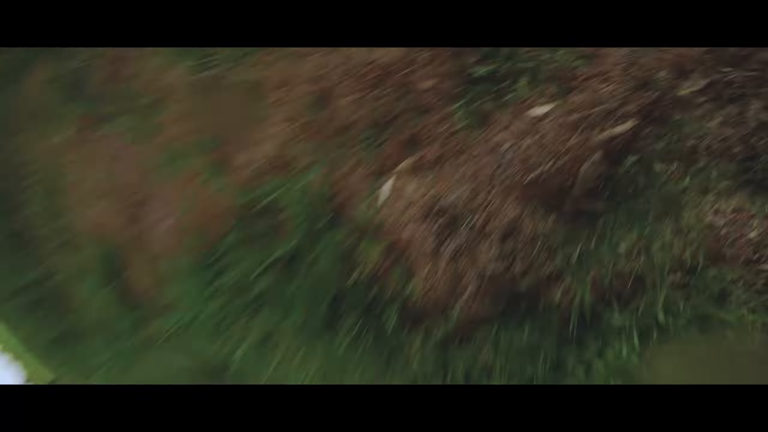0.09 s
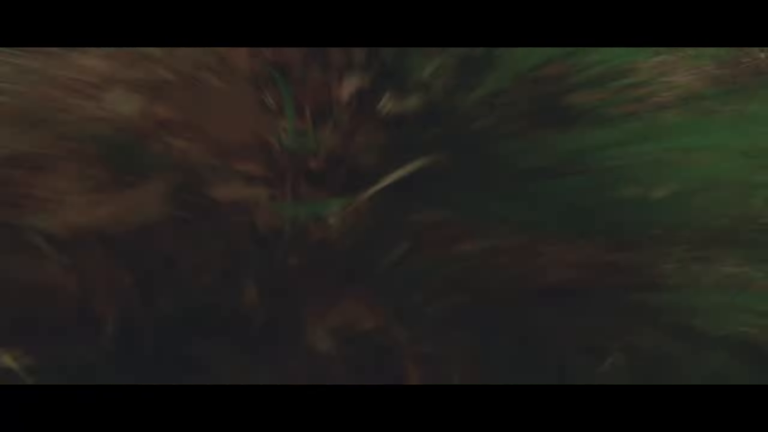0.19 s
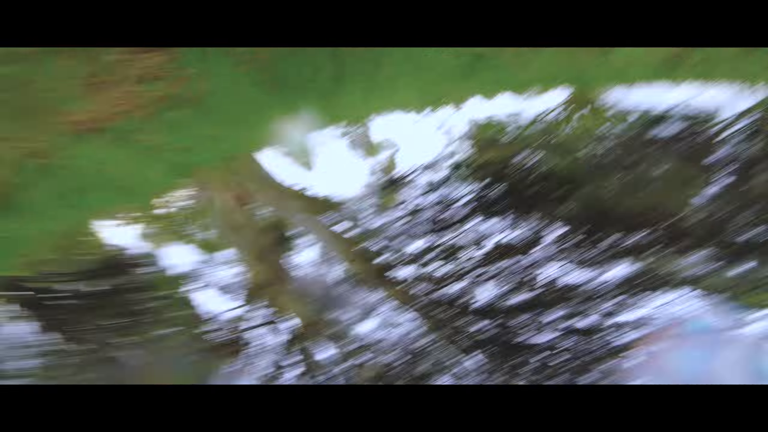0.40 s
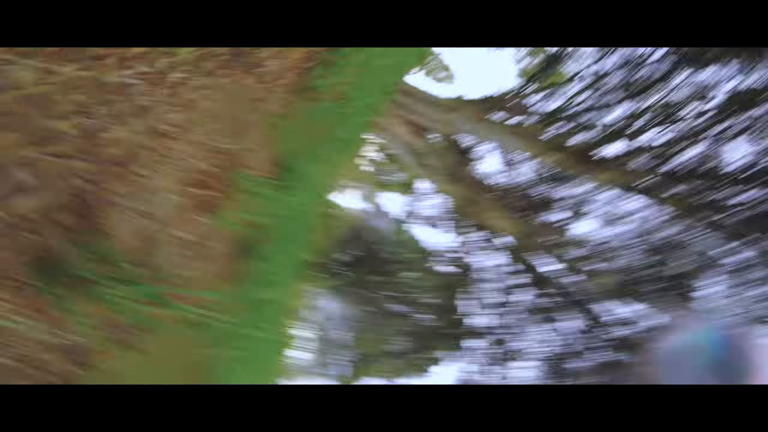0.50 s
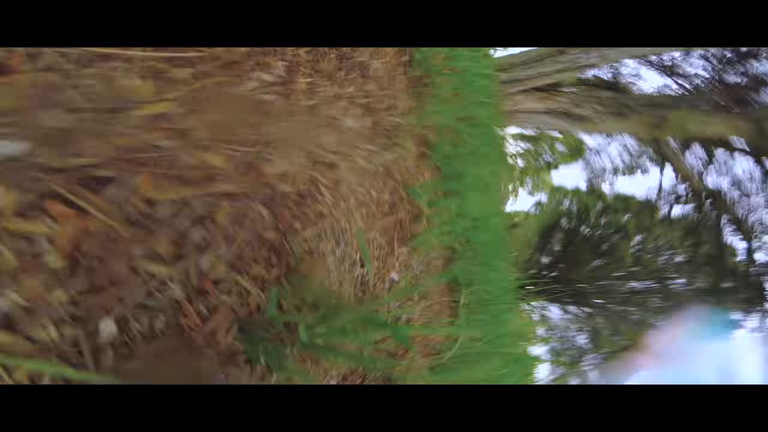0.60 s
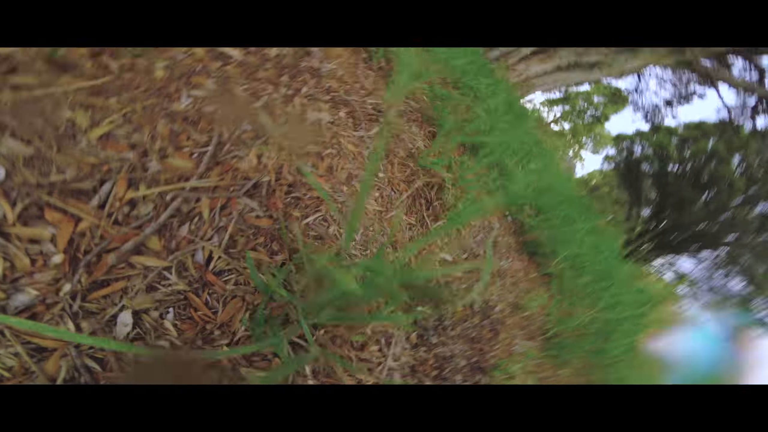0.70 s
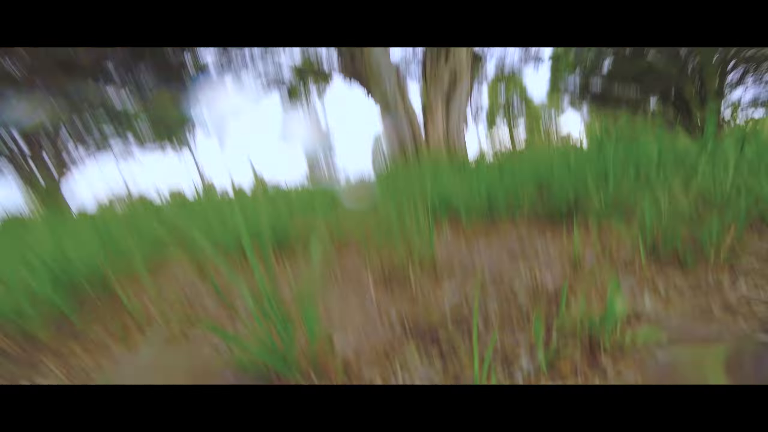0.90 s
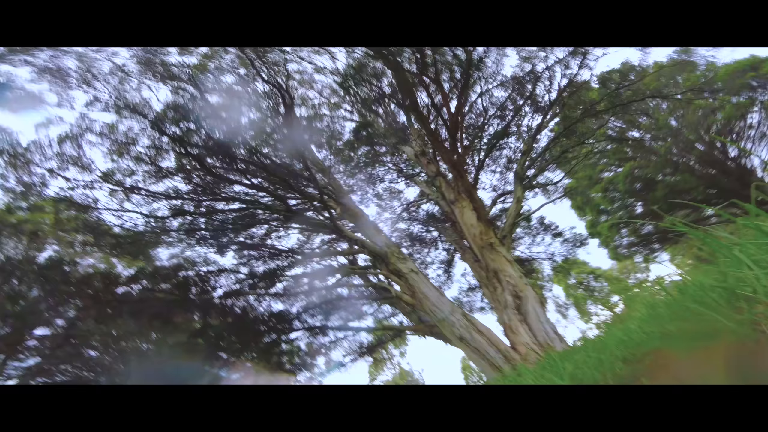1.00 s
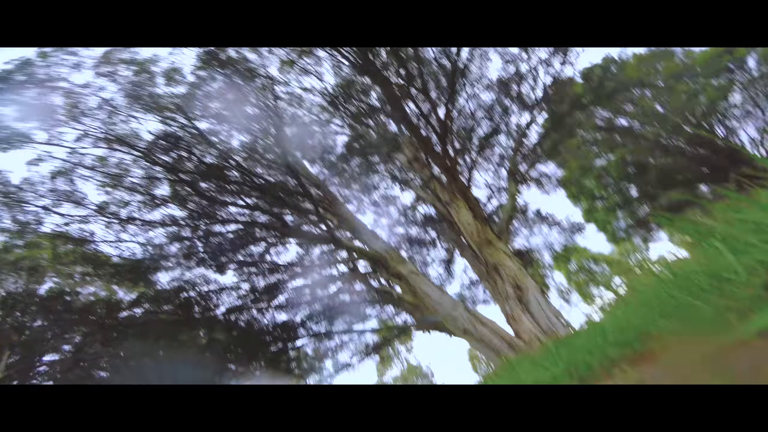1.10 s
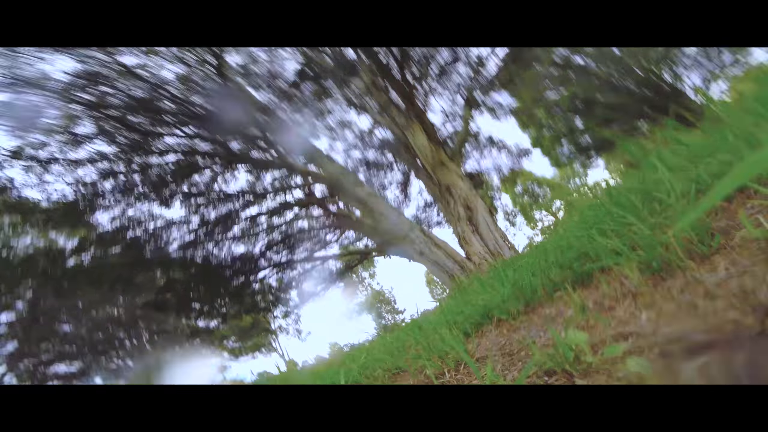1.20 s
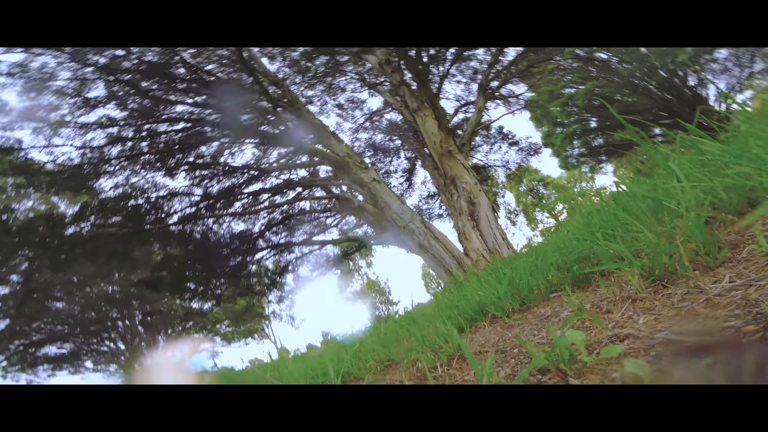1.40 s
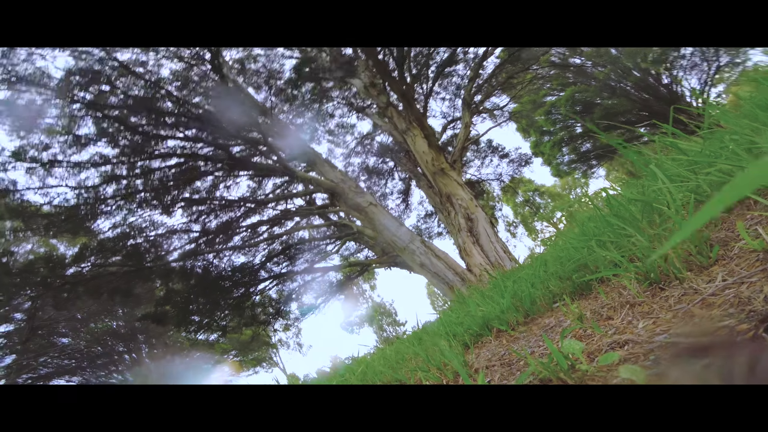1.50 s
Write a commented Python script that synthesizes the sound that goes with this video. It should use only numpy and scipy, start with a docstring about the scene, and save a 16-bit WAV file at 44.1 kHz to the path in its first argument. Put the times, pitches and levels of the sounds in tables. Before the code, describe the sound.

A small drone slams into grass and bark litter outdoors, a burst of distorted thuds, plastic knocks and twig snaps, then a few much weaker bumps, heard close through a microphone fixed to its frame.

```python
"""A small drone tumbles over grass and bark litter, heard from a camera bolted to it, mostly through its body.
A faint wavering sine hum of coasting propellers and noise layers of sway, shaking, scraping and rustling
run throughout. Near 0.2 s the first crash overloads the microphone: blows swing the soft mount and ring the
arms, crunchy knocks ring the frame and twig ticks ring the microphone port, all as filtered pulses.
Weaker contacts follow near 0.6 s, 1.0 s and from 1.2 s on."""
import sys
import numpy as np
from scipy import signal
from scipy.fft import rfft, irfft, next_fast_len
from scipy.io import wavfile
from scipy.ndimage import uniform_filter1d, map_coordinates

SR = 44100
rng = np.random.default_rng(int(sys.argv[2]) if len(sys.argv) > 2 else 0)


def wav_out(sig):
    """Save sig, one row per channel (or a flat mono array), as 16-bit PCM at SR to the path in sys.argv[1]."""
    wavfile.write(sys.argv[1], SR, np.round(np.clip(np.atleast_2d(sig).T, -1, 1) * 32767).astype(np.int16))


def voltage_ratio(level):
    """Linear amplitude factor for a level in decibels (scalar or array-like)."""
    return 10 ** (np.asarray(level, float) / 20)


N = 66150  # samples, 1.5 s

# Resonances of the microphone port. Each row: centre in Hz, width in Hz, gain in dB.
PORT = [(3060, 520, 5.5), (5854, 3860, 6.5), (9000, 1200, -2)]


def curves(rows):
    """Piecewise-linear interpolation: one value per sample for each column after the time."""
    s, *columns = np.transpose(rows)
    return [np.interp(np.arange(N) / SR, s, column) for column in columns]


def unit(x):
    """Normalization to an rms of 1."""
    return x / np.sqrt(np.mean(x ** 2) + 1e-20)


def filtered(x, response):
    """Linear filtering: the spectrum of x times a complex response of frequency."""
    m = next_fast_len(len(x) + SR // 2)  # zero padding leaves room for the ringing
    spectrum = rfft(x, m) * response(np.fft.rfftfreq(m, 1 / SR))
    return irfft(spectrum, m)[:len(x)]


def ring(x, modes, steep_hz):
    """Modal superposition: parallel damped resonators, rolled off at sixth order above steep_hz."""
    def response(f):
        body = sum(voltage_ratio(db) * 1j * f * width / (centre ** 2 - f * f + 1j * f * width)
                   for centre, width, db in modes)
        skirt = 1 + 1j * np.sqrt(2) * f / steep_hz - (f / steep_hz) ** 2
        return body / skirt ** 3
    return filtered(x, response)


def grains(per_s, spread_db):
    """Shot noise: impacts at random moments, Gaussian sizes with an exponential spread in dB."""
    hit = rng.random(N) < per_s / SR
    return hit * rng.standard_normal(N) * voltage_ratio(spread_db * rng.exponential(size=N))


def patchy(x):
    """Time-frequency modulation: smooth random patches of gain, 4 dB rms."""
    z = signal.stft(x, nperseg=512)[2]
    field = uniform_filter1d(rng.standard_normal(z.shape), size=4, axis=0)
    field = uniform_filter1d(field, size=5, axis=1)
    return signal.istft(z * voltage_ratio(4 * unit(field)), nperseg=512)[1][:N]


def propellers():
    """Frequency and amplitude modulation of a sine: a faint hum that wavers and mostly sinks as they coast."""
    # Each row: time in seconds, hum before waver in Hz, level before flutter in dB.
    coast = [(.02, 292, -60), (.06, 300.2, -46.5), (.14, 300, -67.5), (.3, 250, -80.5), (.45, 216.3, -51.5),
             (.55, 209.1, -60), (.68, 203, -51.5), (.76, 185.3, -51), (.86, 200, -58), (1, 173.5, -53.5),
             (1.1, 150.2, -42.5), (1.2, 145.2, -78.5), (1.3, 140, -79)]
    wavers_per_s, waver, flutter_db = 25, 0.025, 4
    hz, db = curves(coast)
    points = rng.standard_normal((2, 60))
    position = np.arange(N) * wavers_per_s / SR
    # a smooth spline through the random points of each row
    flutter_drift, pitch_drift = map_coordinates(points, [[[0], [1]] * np.ones(N), [position] * 2])
    phase = 2 * np.pi * np.cumsum(hz * (1 + waver * pitch_drift)) / SR
    return voltage_ratio(db + flutter_db * flutter_drift) * np.sin(phase)


def rustle():
    """Shot noise through resonances: grass impacts heard through the microphone port."""
    impacts = grains(3000, spread_db=0.5)
    bright = ring(impacts, PORT[1:], steep_hz=12400)
    return ring(bright, PORT, steep_hz=13600)


def scrape():
    """Friction as dense shot noise: litter dragged past excites resonances in shifting patches."""
    # Each row: centre in Hz, width in Hz, gain in dB.
    litter = [(606, 1000, -3), (1050, 100, 6), (1355, 300, -2), (1560, 380, -3)]
    return patchy(ring(grains(4000, spread_db=1), litter, steep_hz=2020))


def shake():
    """Random forcing of a resonant structure: sparser impacts shake the frame."""
    # Each row: centre in Hz, width in Hz, gain in dB.
    shake_modes = [(106, 29, -5.5), (160, 76, 14), (200, 45, -0.5), (300, 160, -6.5), (431, 220, -22)]
    return ring(grains(900, spread_db=-0.5), shake_modes, steep_hz=530)


def sway():
    """Spectral shaping of white noise: the slow, low-frequency sway of the mount."""
    # Each row: frequency in Hz, relative spectral density in dB.
    sway_spectrum = [(20, -0.5), (35, 4.5), (55, -8), (85, -11), (120, -40.5), (200, -75.5)]
    hz, db = np.transpose(sway_spectrum)
    return filtered(rng.standard_normal(N), lambda f: voltage_ratio(np.interp(np.log(f + 1), np.log(hz), db)))


def tumble():
    """Superposition of sources under slow envelopes: the body is jostled and dragged."""
    # Each row: time in seconds, then levels in dB of sway, shaking frame, scrape and rustle.
    tumble_levels = [(0.02, -39, -51.5, -75.5, -122), (0.172, -37.5, -56, -74, -88.5),
                     (0.216, -20, -25.5, -45, -41.5), (0.242, -17.5, -61, -85, -50.5),
                     (0.254, -42, -41, -51, -77.5), (0.282, -20.5, -59, -64, -82),
                     (0.344, -27, -35, -51.5, -65.5), (0.448, -40.5, -55, -71.5, -88),
                     (0.506, -36.5, -45, -57.5, -90), (0.568, -37, -57, -85, -127.5),
                     (0.576, -56, -85, -62, -76), (0.6, -18, -36, -52, -63),
                     (0.654, -36.5, -50, -71.5, -96), (0.844, -53.5, -56, -73.5, -83.5),
                     (0.892, -35.5, -43, -59, -69.5), (0.958, -32, -45, -71.5, -82),
                     (1.004, -25, -31, -43.5, -60.5), (1.016, -46, -42.5, -58, -73),
                     (1.07, -25, -43.5, -74, -87.5), (1.12, -63.5, -47.5, -58.5, -72),
                     (1.144, -56, -44, -61.5, -77.5), (1.202, -33, -50.5, -62.5, -79.5),
                     (1.218, -49.5, -34, -55.5, -66.5), (1.248, -28, -40.5, -66, -76.5),
                     (1.272, -54.5, -47.5, -63.5, -72), (1.284, -39.5, -43.5, -72.5, -80.5),
                     (1.346, -34.5, -59.5, -81, -93), (1.45, -34, -53, -72, -79),
                     (1.49, -44.5, -58, -69.5, -96), (1.5, -40.5, -56, -79, -92)]
    layers = [sway(), shake(), scrape(), rustle()]
    return sum(voltage_ratio(db) * unit(x) for db, x in zip(curves(tumble_levels), layers))


def ticks():
    """Impulsive excitation: each twig tick is a decaying noise crack that rings the microphone port."""
    # Each row: start in seconds, peak level in dB.
    tick_rows = [(0.2009, -70), (0.2114, -29.5), (0.2244, -22.5), (0.2277, -21), (0.2384, -38),
                 (0.2414, -49), (0.3287, -70.5), (0.3721, -52), (0.4189, -58.5), (0.4409, -64.5),
                 (0.5102, -64), (0.5761, -58.5), (0.6044, -48.5), (0.7482, -69.5), (0.8834, -59.5),
                 (0.9852, -69.5), (0.9904, -52), (1.0031, -57), (1.0031, -45), (1.1094, -65),
                 (1.2156, -76.5), (1.27, -58)]
    out, t = np.zeros(N + SR), np.arange(SR // 50) / SR
    for s, db in tick_rows:
        crack = rng.standard_normal(len(t)) * np.exp(-t / 0.0015)
        sound = ring(ring(crack, PORT, steep_hz=12100), PORT, steep_hz=15500)
        out[round(s * SR):][:len(t)] += voltage_ratio(db) * sound / np.abs(sound).max()
    return out[:N]


def knocks():
    """Impact excitation of modes: a snap with crumbs behind it rings the frame; softer contact, lower top."""
    # Each row: start in seconds, peak level in dB, crumbling time in seconds, top of the spectrum in Hz.
    knock_rows = [(0.195, -39, 0.009, 2000), (.213, -25.5, 0.0015, 2000), (.217, -18.5, 0.0075, 1250),
                  (.221, -11, 0.0021, 1710), (.225, -16, 0.007, 1320), (.229, -9.5, 0.0014, 1480),
                  (.234, -12.5, 0.01, 1150), (.238, -12.5, 0.0032, 1440), (0.238, -11.5, 0.0026, 1960),
                  (0.3, -38.5, 0.015, 1760), (0.331, -41, 0.013, 1280), (0.343, -60, 0.0036, 1860),
                  (0.375, -40, 0.0076, 1960), (.476, -52, 0.011, 1940), (0.508, -41.5, 0.007, 2000),
                  (0.582, -32, 0.0064, 1700), (0.597, -35, 0.0089, 1760), (0.61, -40, 0.015, 1900),
                  (0.657, -48.5, 0.013, 970), (0.869, -51, 0.015, 1690), (0.986, -28.5, 0.0045, 1135),
                  (1.003, -28, 0.0023, 2410), (1.025, -43.5, 0.0031, 1200), (1.0742, -37, 0.0067, 1050),
                  (1.087, -45, .006, 930), (1.229, -28, 0.0023, 2390), (1.236, -42, .004, 1200),
                  (1.315, -46, 0.0033, 1143), (1.319, -47, .003, 1150), (1.45, -38, 0.0024, 1130),
                  (1.455, -44.5, 0.0031, 920)]
    # Each row: centre in Hz, width in Hz, gain in dB.
    frame_modes = [(430, 180, 0), (596, 240, 9.5), (833, 200, 8), (1050, 510, -3), (1474, 350, 10.5),
                   (2000, 450, -16.5)]
    out, t = np.zeros(N + SR), np.arange(SR // 10) / SR
    for s, db, length_s, top_hz in knock_rows:
        snap = t == 0
        crumbs = 0.09 * rng.standard_normal(len(t)) * np.exp(-(t / length_s) ** 2)
        sound = ring(snap + crumbs, frame_modes, top_hz)
        # the finite contact softens the top further
        sound = filtered(sound, lambda f: 1 / (1 + 1j * f / top_hz - (f / top_hz) ** 2) ** 2)
        out[round(s * SR):][:len(t)] += voltage_ratio(db) * sound / np.abs(sound).max()
    return out[:N]


def blows():
    """Forced vibration: a smooth push swings the mount and rings the arms, a little differently each time."""
    # Each row: start in seconds, peak level before the signed factor in dB, contact in seconds,
    # signed factor for direction and strength, gain added to the arm modes in dB.
    blow_rows = [(.110, -33.5, 0.012, -1.94, 9), (.204, -17, 0.0022, -1.3, -11.5),
                 (0.21, -13, 0.0048, -1.97, 4), (0.2169, 5.5, 0.0023, 1, 4),
                 (0.2232, -6, 0.0024, -0.48, -9), (0.2306, -5, 0.0044, 1, 1.5),
                 (0.2383, 0, 0.0013, -1.03, -0.5), (0.2413, -1.5, 0.00264, -1.14, 24.5),
                 (0.304, -36.5, 0.0058, 0.55, -12.5), (0.334, -18.5, 0.026, 0.4, -18),
                 (0.349, -26, 0.0097, -0.01, -26), (.385, -33, 0.018, -1.63, -24.5),
                 (0.587, -20.5, 0.0058, 0.94, 12.5), (.596, -27, 0.00396, -1.04, 15),
                 (.606, -26.5, 0.0097, 0.65, -5.5), (0.625, -17.5, 0.0054, -1.39, -8.5),
                 (0.885, -44.5, 0.015, 0.72, -20), (0.921, -26.5, 0.0052, -1.14, 2.5),
                 (0.988, -12.5, 0.016, 1, -13), (1, -18.5, 0.0058, -1.12, 6),
                 (1.007, -13.5, 0.0031, -1.07, 2.5), (1.014, -13, 0.0037, -0.71, -7.5),
                 (1.034, -51, 0.0032, 0.39, -15), (1.112, -34, 0.0094, -1.86, -21),
                 (1.216, -18, 0.0059, 1, -9.5), (1.222, -15, 0.013, -1.2, -23.5),
                 (1.273, -24, 0.0036, 1, -11), (1.298, -23, 0.012, -1, -1.5),
                 (1.422, -32, 0.019, -0.59, -12.5)]
    # The soft camera mount. Each row: centre in Hz, width in Hz, gain in dB.
    mount_modes = [(47.87, 11.5, 5.5), (29.6, 55, -7), (69.4, 27, -18.5)]
    # The bending arms. Each row: centre in Hz, width in Hz, gain before each blow's own change in dB.
    arm_modes = [(140, 47, -1.5), (172, 41, -5.5), (250, 57.4, -8), (333, 58, -6.5)]
    vary_db = 2
    out, t = np.zeros(N + SR), np.arange(SR // 3) / SR
    for s, db, contact_s, way, arms_db in blow_rows:
        push = np.sin(np.pi * np.clip(t / contact_s, 0, 1)) ** 2
        arms = [(centre, width, gain + arms_db + vary_db * rng.standard_normal())
                for centre, width, gain in arm_modes]
        sound = ring(push, [*mount_modes, *arms], steep_hz=727)
        out[round(s * SR):][:len(t)] += way * voltage_ratio(db) * sound / np.abs(sound).max()
    return out[:N]


def scene():
    """Linear superposition: hum and tumbling under ticks, knocks and blows, in one channel."""
    return (propellers() + tumble() + ticks() + knocks() + blows())[None]


def roll_off(x):
    """The treble ends steeply here."""
    return signal.sosfilt(signal.butter(12, 15570, fs=SR, output="sos"), x)


def record(dry):
    """Saturation and band limiting: soft microphone overload, faint port-coloured hiss, two cutoffs."""
    overload, knee = 0.61, 5  # limiting amplitude, sharpness of the bend
    low_hz, top_hz, hiss_db = 23.8, 12500, -89
    x = dry[0] / (1 + np.abs(dry[0] / overload) ** knee) ** (1 / knee)
    hiss = voltage_ratio(hiss_db) * unit(ring(rng.standard_normal(N), PORT, steep_hz=10900))

    def band(f):
        high_pass = 1j * f / (low_hz + 1j * f)
        return high_pass / (1 + 1j * np.sqrt(2) * f / top_hz - (f / top_hz) ** 2) ** 2
    return roll_off(filtered(x + hiss, band)[None])


dry = scene()
out = record(dry)
wav_out(out)
```